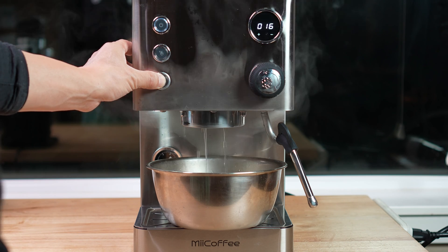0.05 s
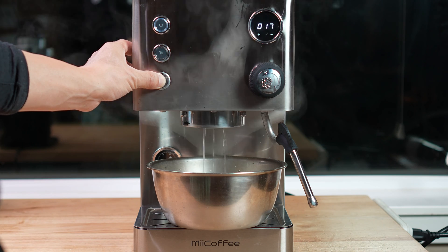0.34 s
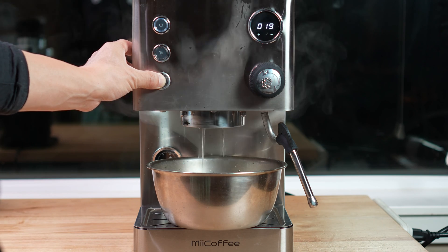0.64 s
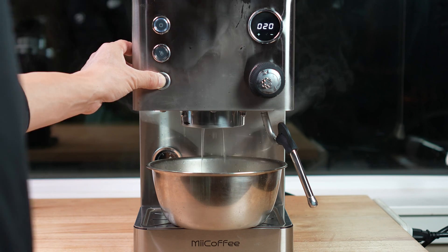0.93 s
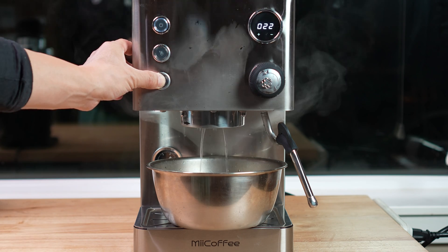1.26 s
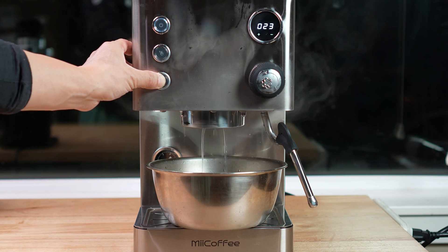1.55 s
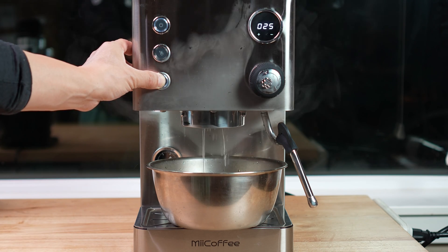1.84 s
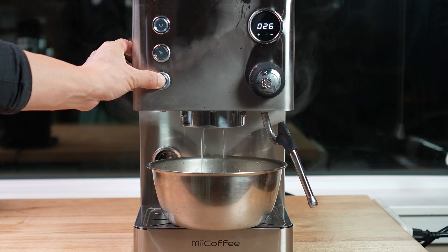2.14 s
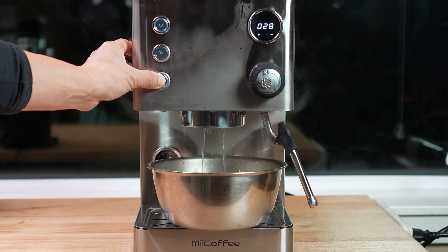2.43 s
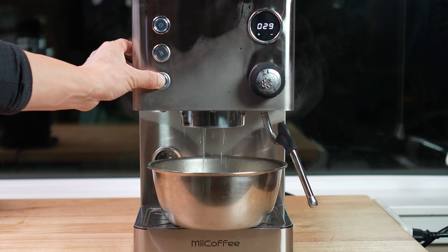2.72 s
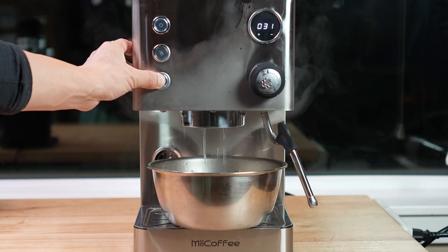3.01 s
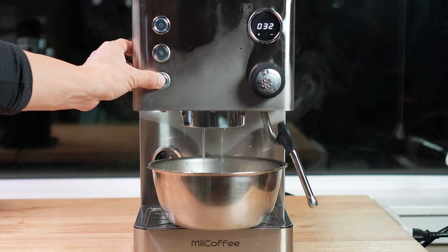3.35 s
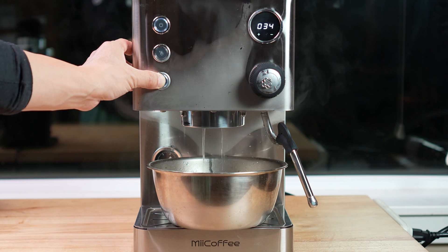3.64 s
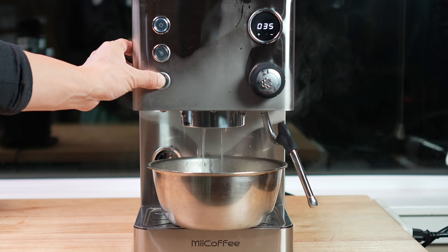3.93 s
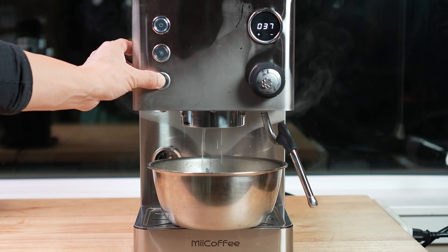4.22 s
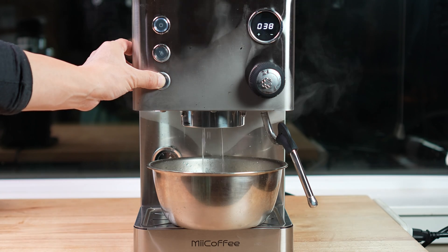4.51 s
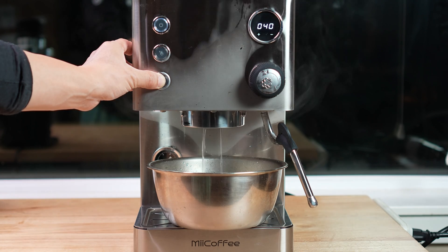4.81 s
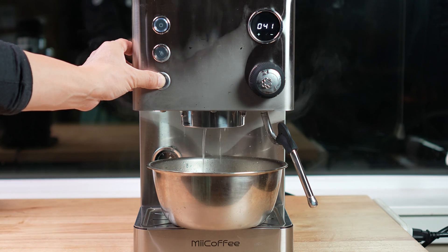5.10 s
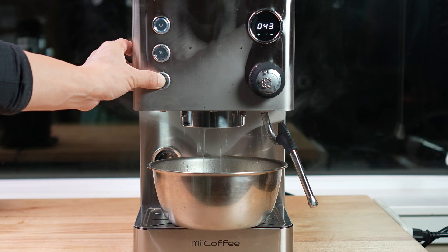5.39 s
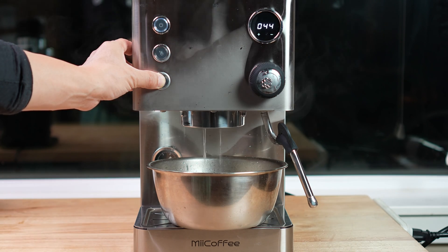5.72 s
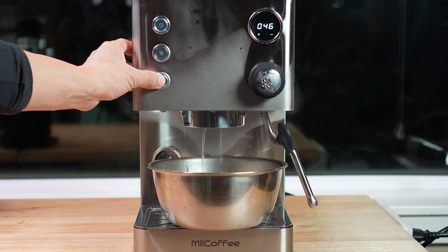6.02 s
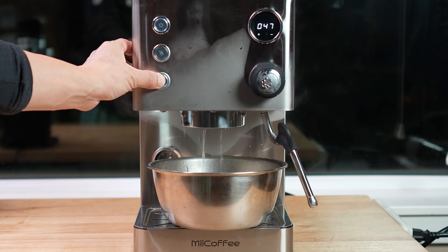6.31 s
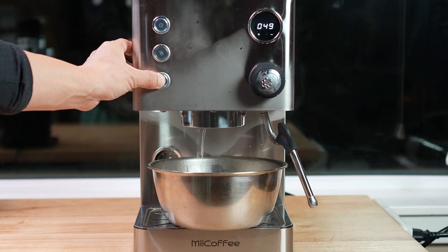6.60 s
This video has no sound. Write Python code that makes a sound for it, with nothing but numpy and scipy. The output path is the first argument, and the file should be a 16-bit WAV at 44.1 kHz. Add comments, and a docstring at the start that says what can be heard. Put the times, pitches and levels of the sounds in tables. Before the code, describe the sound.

Close, steady buzzing whine of an espresso machine, with a rattling casing and hot water hissing and spattering into a metal bowl.

```python
"""A buzzing whine is heard first: an espresso machine's pump, striking at a mains-locked 300 Hz.
Its periodic strokes give a harmonic series that flutters as they vary and throbs as the water boils.
Turbulent flow rattles the resonant casing, while hot water hisses, spits and sizzles into a steel bowl.
The filling bowl adds faint gliding tones. The sound is close and almost mono, in a quiet room."""
import sys
import numpy as np
from scipy import signal
from scipy.fft import rfft, irfft
from scipy.io import wavfile
from scipy.ndimage import uniform_filter1d

SR = 44100
rng = np.random.default_rng(int(sys.argv[2]) if len(sys.argv) > 2 else 0)


def unload_audio(sound):
    """Save the sound as a 16-bit wav file, at the path given as the first command line argument."""
    columns = np.transpose(np.atleast_2d(sound))
    # keep every value between -1 and 1, then stretch to whole-number steps
    steps = np.round(np.clip(columns, -1, 1) * 32767)
    wavfile.write(sys.argv[1], SR, steps.astype(np.int16))


N = 297675
TIME = np.arange(N) / SR
FREQS = np.fft.rfftfreq(N, 1 / SR)
PUMP_HZ = 300

# Harmonics of the pump. Each row: harmonic number, relative level in dB.
HARMONICS = [(1, -57.7), (2, -48.1), (3, -43.1), (4, -41.9), (5, -42.5), (6, -36.7), (7, -36.6), (8, -43.4),
             (9, -45.8), (10, -46.4), (11, -54.2), (12, -45.6), (13, -48.5), (14, -49.9), (15, -60.8),
             (16, -58.9), (17, -56.9), (18, -53.8), (19, -64.3), (20, -60.6), (21, -51.5), (22, -57.9),
             (23, -58.8), (24, -56.3), (25, -57.6), (26, -49.3), (27, -52.6), (28, -50.3), (29, -50.7),
             (30, -55.3), (31, -58.7), (32, -54.9), (33, -55.5), (34, -59.1), (35, -51.6), (36, -56.5),
             (37, -59.5), (38, -58.1), (39, -63.9), (40, -65.5), (41, -62.3), (42, -60.5), (43, -62.9),
             (44, -60.3), (45, -61.1), (46, -60.6), (47, -64.1), (48, -63.2), (49, -64.5), (50, -66.0),
             (51, -63.0), (52, -70.4)]
# Force of the strokes, heard on harmonics 6 and 7. Each row: time in seconds, relative level in dB.
STROKE_FORCE = [(0.0, -30.5), (0.43, -30), (1.78, -34.5), (1.8, -37), (2.99, -35), (3.46, -39),
                (3.52, -35.5), (4.44, -34.5), (5.3, -38.5), (5.53, -34), (5.75, -36), (5.81, -32),
                (6.02, -34.5), (6.75, -32.5)]
# A dip climbs through harmonics 1 to 5. Each row: deepest moment in seconds, bluntness in seconds.
HARMONIC_DIPS = [(0, 1.7), (2.4, 1.54), (3.0, 0.88), (4.25, .06), (4.7, 1.2)]
# Loose casing parts in resonance. Each row: start in seconds, end in seconds, frequency in Hz, lift in dB.
LOOSE_PARTS = [(3.2, 5.7, 2400, 3), (1.15, 6.9, 2700, 9), (0, .9, 3000, 10), (2.3, 3.4, 3000, 5),
               (4.85, 5.6, 3000, 9), (0, 1.5, 3300, 9), (1.0, 4.2, 3600, 5), (4.6, 5.3, 3600, 7),
               (0, 1.0, 3900, 7), (2.9, 3.45, 3900, 7), (5.15, 5.6, 3900, 9), (3.5, 4.35, 4200, 10),
               (5.12, 5.32, 4200, 11), (.1, 1.3, 5100, 9), (3.9, 4.8, 5400, 7), (0, .7, 6300, 6),
               (5.12, 6.9, 6300, 6)]
# Throbbing of the boiling water. Each row: time in seconds, relative depth from 0 to 1.
THROB_DEPTH = [(0, 0.13), (.9, 0.9), (2.0, 1), (4.6, .55), (5.9, .6), (6.75, 0.6)]
# Strength of the flow. Each row: time in seconds, relative rattle level in dB, relative hiss level in dB.
FLOW_LEVELS = [(0.0, -43.5, -32.5), (0.49, -41.5, -33), (1.75, -41, -33.5), (1.86, -43.5, -34),
               (3.03, -42.5, -35.5), (3.33, -45, -35.5), (4.19, -44.5, -36), (5.19, -44.5, -35.5),
               (5.3, -44.5, -33.5), (5.55, -44.5, -36.5), (5.75, -44.5, -33.5), (5.81, -43, -37),
               (6.03, -44.5, -35), (6.75, -42, -35.5)]
# Spectrum of the rushing water. Each row: frequency in Hz, relative spectral level in dB.
RUSH_SPECTRUM = [(60, -24), (200, -19), (400, -13.5), (900, -7), (1200, -6.5), (2500, -1.5), (4000, -6.5),
                 (4700, -3.5), (6500, -1.5), (8500, 0.5), (11000, -2.5), (15500, -4)]
# Resonances and notches of casing and pipes. Each row: centre in Hz, bandwidth in Hz, gain in dB.
CASING_MODES = [(1015, 52, -7.5), (1130, 130, 3), (1206, 260, 9), (1355, 53, -9), (1442, 300, 7.5),
                (1840, 73, 7), (2024, 71, 12.5), (2320, 95, 16.5), (2380, 260, -5.5), (2880, 370, 10),
                (2973, 79, -1), (3547, 360, 11), (3940, 150, 9.5), (4217, 160, 10), (4600, 79, -9),
                (5404, 58, 5.5), (7040, 240, 4), (7620, 450, 3.5), (8400, 20, 13)]
# Left-right difference of the rush. Each row: frequency in Hz, gain of the side signal in dB.
STEREO_SIDE = [(60, -54), (2500, -77), (4400, -60.5), (6000, -79), (8100, -12.5), (15000, -10.5)]
# Loudest spits. Each row: start in seconds, relative peak in dB, pitch in Hz, 60 dB decay time in seconds.
LOUD_SPITS = [(1.222, -29, 11000, 0.016), (1.634, -31, 15000, .025), (1.776, -28, 5500, 0.035),
              (2.617, -31, 14200, .012), (3.72, -31, 8140, .025), (4.875, -28.5, 5330, .025),
              (5.018, -29, 8000, .02), (5.418, -34, 14160, .015), (5.475, -32, 12000, .015),
              (5.936, -27, 15100, .02)]
# Spells of sizzling at the outlet. Each row: start in seconds, end in seconds, level in dB.
SIZZLE_SPELLS = [(3.5, 5.2, -44.5), (5.23, 5.54, -39), (6.042, 6.9, -44)]
# Ringing bands of the sizzle. Each row: centre in Hz, bandwidth in Hz, relative level in dB.
SIZZLE_MODES = [(3870, 200, 4), (4750, 450, -5.5), (5320, 71, 5.5), (9400, 650, -3.5), (13700, 700, -12)]
# Tones of the filling bowl.
# Each row: start in seconds, length in seconds, first pitch in Hz, last pitch in Hz, relative level in dB.
BOWL_GLIDES = [(2.92, 0.47, 525, 480, -60), (3.35, .45, 480, 543, -62), (3.95, .38, 583, 540, -58),
               (4.94, .14, 200, 180, -71), (5.07, .3, 124, 138, -67), (5.62, .16, 188, 172, -67),
               (5.78, .44, 127, 135, -64.5), (6.28, .5, 138.5, 131.5, -66.5)]


def pump_whine(strokes, throb, flutter=0.07, own_flutter=0.038, shimmer=0.15, throb_db=1.06):
    """Fourier series: periodic strokes give harmonics, and unequal strokes modulate their amplitudes."""
    last_firm = 7  # harmonics up to this one keep orderly phases
    force_db, hiss_db = swings(STROKE_FORCE)[0], swings(FLOW_LEVELS)[1]
    trade = dip(3.25, blunt_s=2.36)  # the 6th harmonic gives way to the 7th for a while
    firm_gains = [dip(*row) for row in HARMONIC_DIPS] + [trade, 1 / trade]
    dispersion = np.interp(TIME, [0, 3.1], [0.29, 0.71])  # tight knocks lengthen into chirps
    unequal = flutter * noise(resonance(67, 55) + .5 * resonance(23, 40))
    quick, slow = noise(resonance(116, 90)), noise(resonance(2.7, 49))
    out = np.zeros(N)
    for k, db in HARMONICS:
        if k <= len(HARMONIC_DIPS):
            db += 0.39 * throb_db * throb
        elif k <= last_firm:  # the strongest harmonics follow the force and throb most
            db += -0.6 + 0.94 * force_db + throb_db * throb + 0.7 * drift(16)
        else:  # the rattling upper ones follow the hiss and wander
            wander_db = 1.2 * min(k * PUMP_HZ / 5000, 1) * drift(2.44)
            db += 0.3 + 0.37 * hiss_db + wander_db + sympathetic_lift(k * PUMP_HZ)
        if k <= last_firm:  # quadratic phase makes each stroke a falling chirp
            phase, gain = dispersion * (k - last_firm + 1) ** 2, firm_gains[k - 1]
            shake = k / last_firm * (unequal + own_flutter * np.roll(quick, rng.integers(N)))
        else:  # the casing scatters the upper phases
            phase, gain = rng.uniform(0, 2 * np.pi), 1
            shake = .5 * unequal + shimmer * np.roll(slow, rng.integers(N))
        out += np.sqrt(2) * amp(db) * gain * (1 + shake) * np.cos(2 * np.pi * k * strokes + phase)
    return out


def sympathetic_lift(hz, fade_s=0.092, top_hz=7400, top_db=8):
    """Sympathetic resonance: loose parts lift a harmonic in spells. In dB, with mean power preserved."""
    lift_db = top_db * (hz > top_hz) * held(-1, 5.55, fade_s)  # the top dulls as the sharpest sizzle ends
    for start, end, part_hz, db in LOOSE_PARTS:
        if abs(part_hz - hz) < PUMP_HZ / 2:
            lift_db += db * held(start, end, fade_s)
    return lift_db - 10 * np.log10(np.mean(amp(lift_db[::256]) ** 2))


def boiling_pressure(surge_hz=6.1, start_s=5.5, end_s=6.55):
    """Pressure fluctuation: boiling throbs at random, joined near the end by regular surges."""
    surges = np.cos(2 * np.pi * surge_hz * (TIME - start_s)) * held(start_s, end_s, fade_s=.15)
    return noise(resonance(8.5, 5.5)) * curves(THROB_DEPTH)[0] + 1.4 * surges


def water_rush(strokes, throb, colour, level_db=-34.0, pulse_depth=0.085, split_hz=3400):
    """Turbulence: broadband noise pulses with each stroke, a casing rattle below and a hiss above."""
    treble = 1 / (1 + (split_hz / (FREQS + 1)) ** 6)
    sinking = resonance(1330, 500)  # this band fades towards the end
    rattle_db, hiss_db = swings(FLOW_LEVELS)
    flicker_db = 1.06 * noise(resonance(9.9, 81)) + 0.64 * throb
    pulsing = (1 + pulse_depth * np.cos(2 * np.pi * strokes)) * amp(flicker_db)
    mid, side = rng.standard_normal((2, N)) * pulsing
    bands = [(dip(6.7, blunt_s=2.7), sinking * (1 - treble)),
             (amp(0.73 * rattle_db), (1 - sinking) * (1 - treble)),
             (amp(1.2 * hiss_db), treble)]
    mid = sum(filtered(mid * level, colour * band) for level, band in bands)
    side = filtered(side * amp(hiss_db), colour * amp(spectrum_db(STEREO_SIDE)))
    return amp(level_db) * np.array([mid + side, mid - side]) / np.std(mid)


def casing_colour():
    """Resonant filtering: casing modes shape the water's spectrum; close metal walls ripple its treble."""
    modes_db = sum(db * resonance(hz, width) for hz, width, db in CASING_MODES)
    ripple = uniform_filter1d(rng.standard_normal(len(FREQS)), size=600)
    ripple = unit_rms(uniform_filter1d(ripple, size=600))
    depth_db = 1.6 * np.clip(FREQS / 2000 - 1.5, 0, 1)  # grows from 3 to 5 kHz
    return amp(spectrum_db(RUSH_SPECTRUM) + modes_db + depth_db * ripple)


def spit(hz, decay_s, width_hz=1700):
    """Impulsive excitation: a bursting droplet gives an exponentially decaying band of noise, peak 1."""
    t = np.arange(2048) / SR
    band = np.clip([hz - width_hz / 2, hz + width_hz / 2], 500, SR / 2 - 500)
    puff = rng.standard_normal(len(t)) * amp(-60 * t / decay_s)
    puff = signal.sosfilt(signal.butter(2, band, "bandpass", fs=SR, output="sos"), puff)
    return puff / abs(puff).max()


def splashes(colour, drops_per_s=110, spit_boost_db=6.0):
    """Shot noise: many small drops land in the bowl at independent moments, and a few spit loudly."""
    out = np.zeros(N)
    pitches = np.geomspace(3200, 15000, 16)
    for hz in pitches:
        sizes = amp(-36 + 1.5 * np.minimum(rng.exponential(1, N), 3))
        landings = rng.random(N) < drops_per_s / len(pitches) / SR
        out += signal.oaconvolve(sizes * landings, spit(hz, decay_s=0.017))[:N]
    hiss_db = swings(FLOW_LEVELS)[1]
    out = filtered(out, colour) * amp(hiss_db)
    for start, db, hz, decay_s in LOUD_SPITS:
        add(out, start, amp(db + spit_boost_db) * spit(hz, decay_s))
    return out


def outlet_sizzle(fade_s=0.043):
    """Noise-driven resonance: the outlet sizzles in spells, in a few ringing bands."""
    level = sum(amp(db) * held(start, end, fade_s) for start, end, db in SIZZLE_SPELLS)
    return level * noise(sum(amp(db) * resonance(hz, width) for hz, width, db in SIZZLE_MODES))


def bowl_tones(gain_db=-3.5, waver_db=2.0):
    """Shifting resonance: thin, wavering tones swell, glide and fade as the water in the bowl moves."""
    out = np.zeros(N)
    for start, length, from_hz, to_hz, db in BOWL_GLIDES:
        progress = np.linspace(0, 1, round(length * SR))
        hz = from_hz + (to_hz - from_hz) * progress
        swell = np.sqrt(2 * abs(np.sin(np.pi * progress)))
        add(out, start, amp(db) * swell * np.sin(2 * np.pi * np.cumsum(hz) / SR))
    return out * amp(gain_db + waver_db * drift(12))


def room_drone(hz=37.5, level_db=-80):
    """Slow amplitude modulation: a faint low tone sinks and returns."""
    return amp(level_db) * dip(3.0, blunt_s=.6) * np.sqrt(2) * np.sin(2 * np.pi * hz * TIME)


def amp(db):
    """Decibel law: 20 dB is a tenfold amplitude."""
    return 10 ** (np.asarray(db) / 20)


def unit_rms(x):
    """Power normalisation to rms 1."""
    return x / np.sqrt(np.mean(x ** 2) + 1e-20)


def curves(rows):
    """Linear interpolation of a table's columns over time."""
    times, *columns = np.transpose(rows)
    return np.array([np.interp(TIME, times, column) for column in columns])


def swings(rows):
    """Deviation of each level curve from its own mean, in dB."""
    db = curves(rows)
    return db - db.mean(1, keepdims=True)


def spectrum_db(rows):
    """Interpolation of levels on a logarithmic frequency axis."""
    hz, db = np.transpose(rows)
    return np.interp(np.log(FREQS + 1), np.log(hz), db)


def resonance(hz, width_hz):
    """Lorentzian curve of one resonance, height 1."""
    return 1 / (1 + (2 * (FREQS - hz) / width_hz) ** 2)


def filtered(x, gain):
    """Linear filtering: each frequency is scaled by its gain."""
    return irfft(rfft(x) * gain, N)


def noise(gain):
    """Spectral shaping of white noise, rms 1."""
    return unit_rms(filtered(rng.standard_normal(N), gain))


def drift(top_hz):
    """Superposed slow sines of random phase give a wander of rms 1."""
    t = TIME[::256]
    rates = top_hz * np.geomspace(.1, 1, 14)[:, None]
    waves = np.sin(2 * np.pi * (rates * t + rng.random(rates.shape))) / np.sqrt(rates)
    return np.interp(TIME, t, unit_rms(waves.sum(0)))


def held(start, end, fade_s):
    """Trapezoidal envelope: it rises, holds at 1 and falls."""
    return np.clip(np.minimum(TIME - start, end - TIME) / fade_s + .5, 0, 1)


def dip(deepest_s, blunt_s, reach_s=3.36):
    """Near cancellation: a gain of rms 1 sinks to a minimum and recovers."""
    return unit_rms(np.hypot(TIME - deepest_s, blunt_s) / np.hypot(TIME - deepest_s, reach_s))


def add(mix, start_s, sound):
    """Superposition of a sound on the mix from a given moment."""
    part = mix[round(start_s * SR):][:len(sound)]
    part += sound[:len(part)]


def scene():
    """Common modulation: whine and rush share one stroke clock and one throb; the other sources add."""
    strokes = PUMP_HZ * TIME + 0.0047 * drift(1.346)  # phase in cycles, wandering slightly
    throb, colour = boiling_pressure(), casing_colour()
    machine = pump_whine(strokes, throb) + water_rush(strokes, throb, colour)
    return machine + splashes(colour) + outlet_sizzle() + bowl_tones() + room_drone()


def record(dry, cutoff_hz=15750):
    """Band limiting: a steep low-pass filter removes the highest treble."""
    low_pass = signal.firwin(601, cutoff_hz, window=("kaiser", 9), fs=SR)
    return signal.oaconvolve(dry, low_pass[None], "same")


dry = scene()
out = record(dry)
unload_audio(out)
```